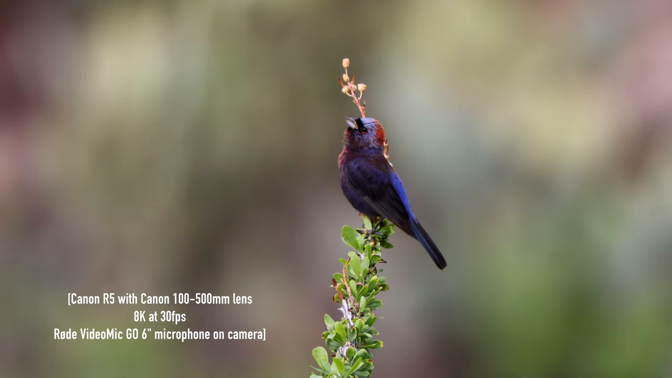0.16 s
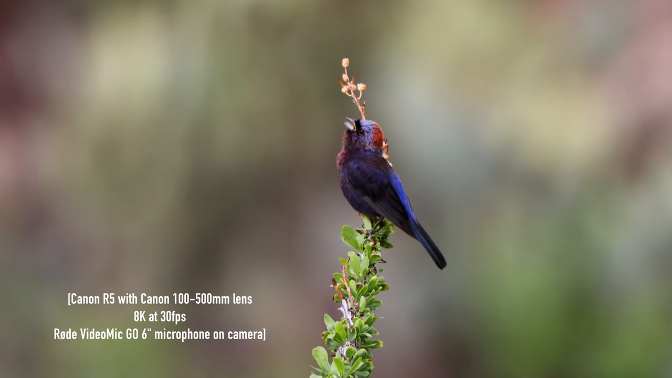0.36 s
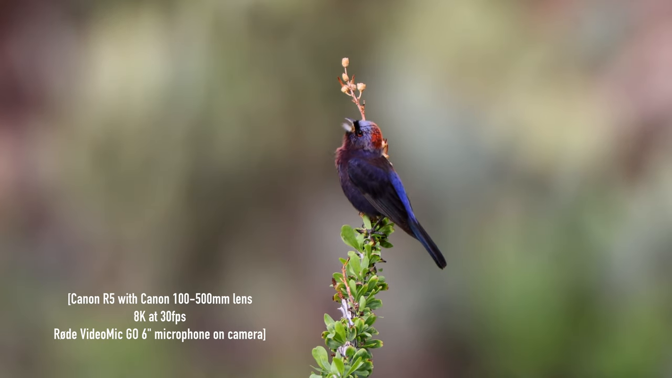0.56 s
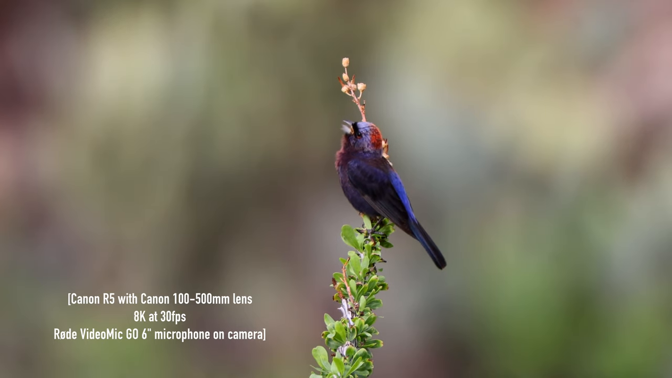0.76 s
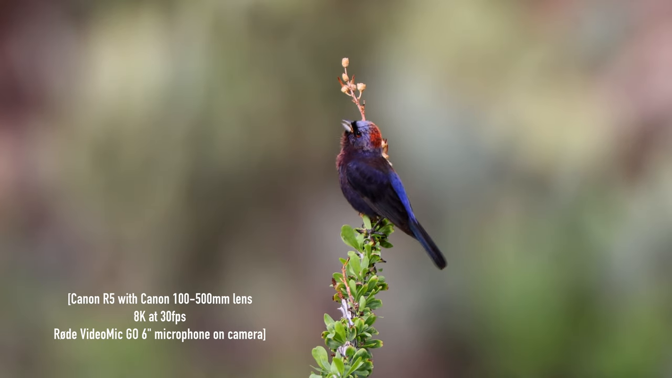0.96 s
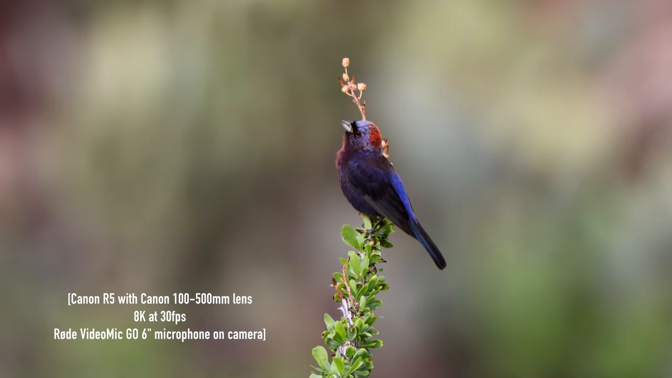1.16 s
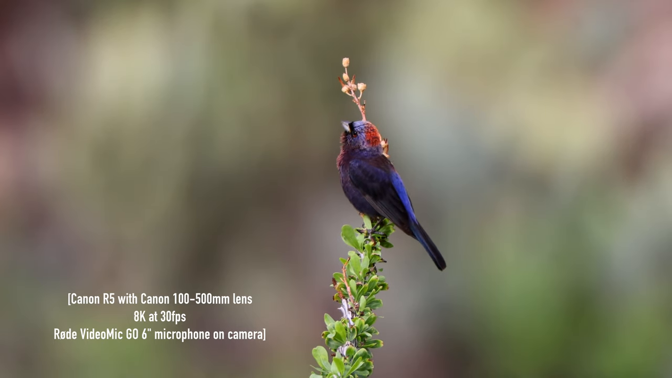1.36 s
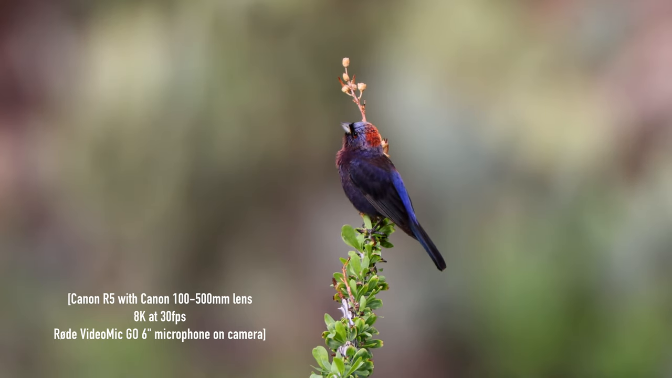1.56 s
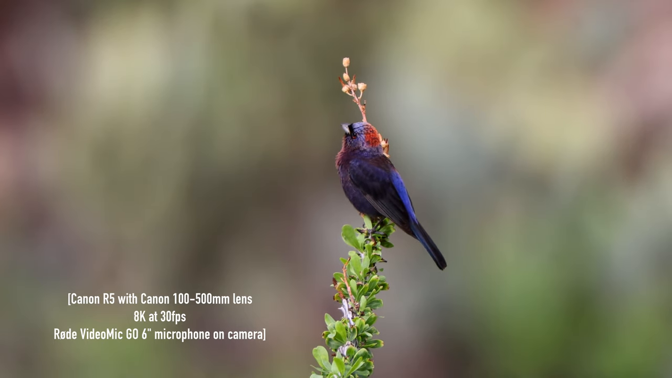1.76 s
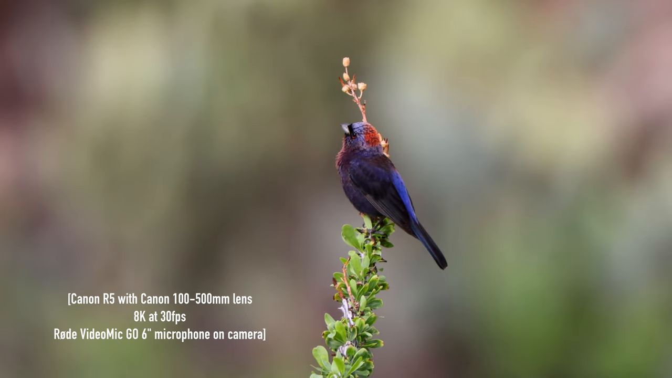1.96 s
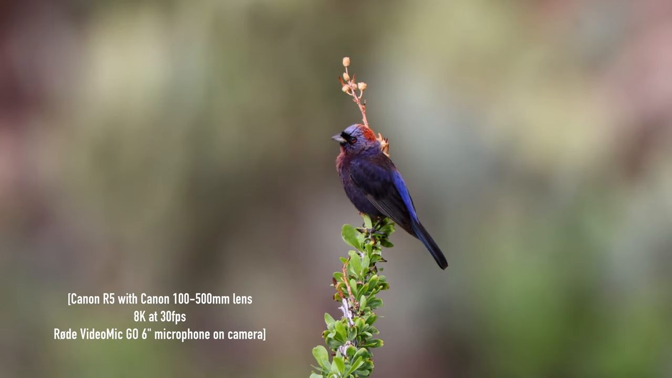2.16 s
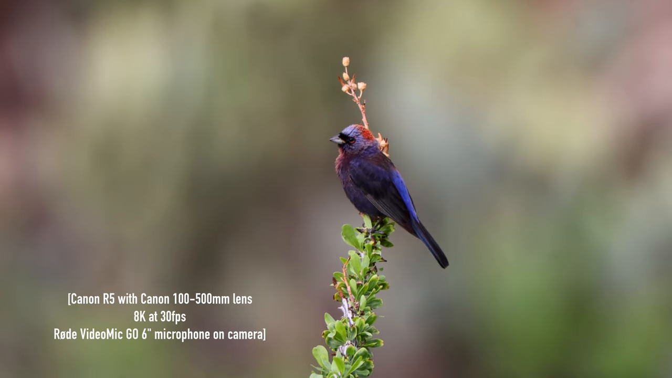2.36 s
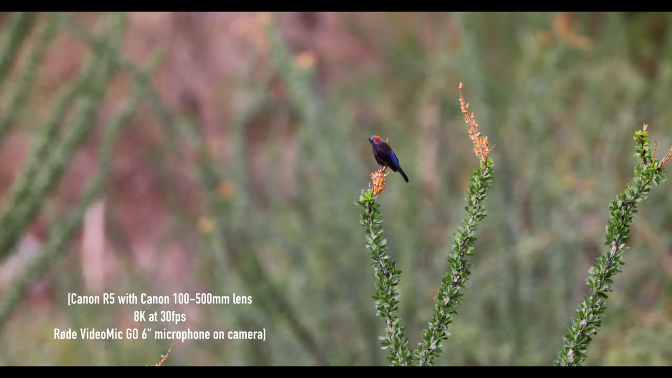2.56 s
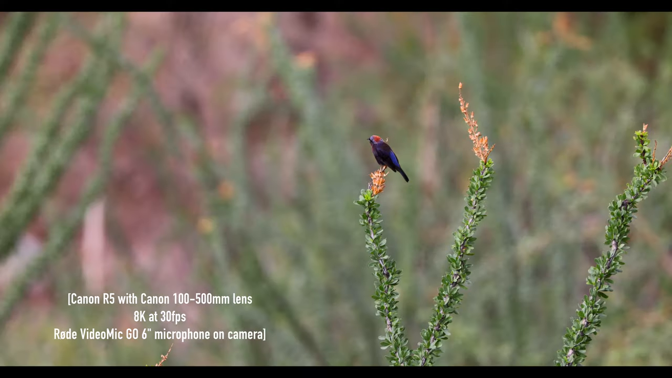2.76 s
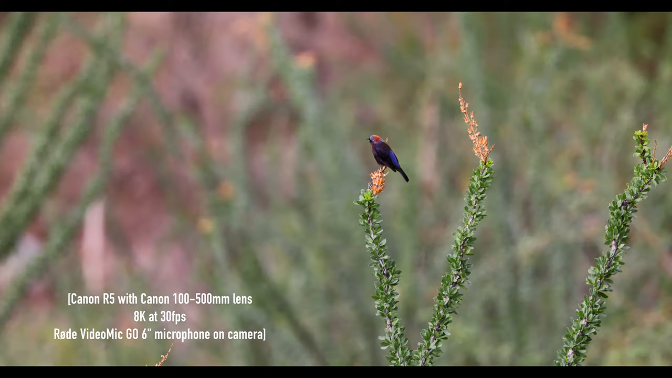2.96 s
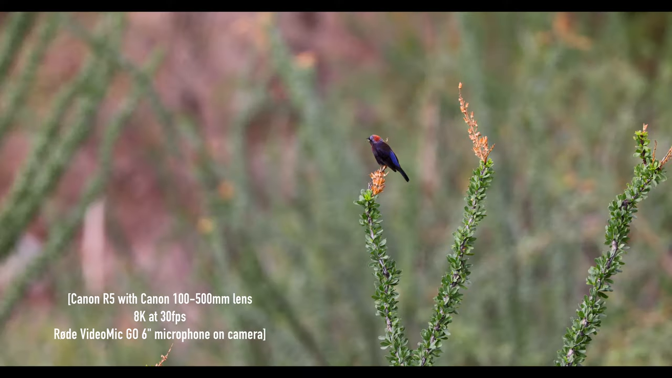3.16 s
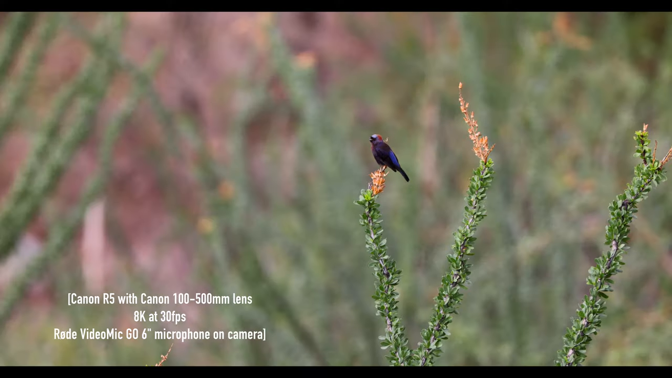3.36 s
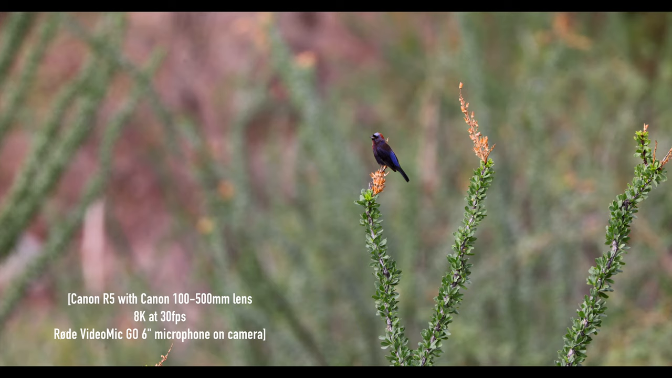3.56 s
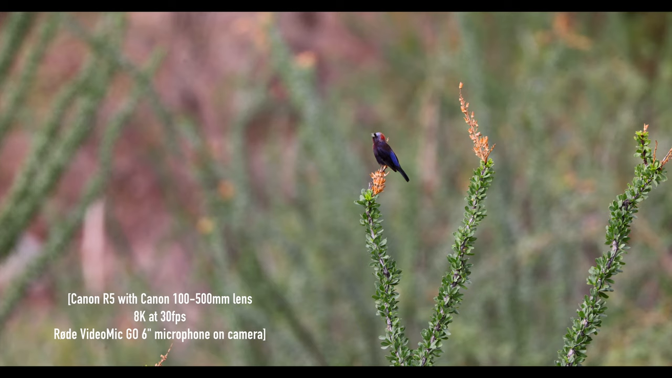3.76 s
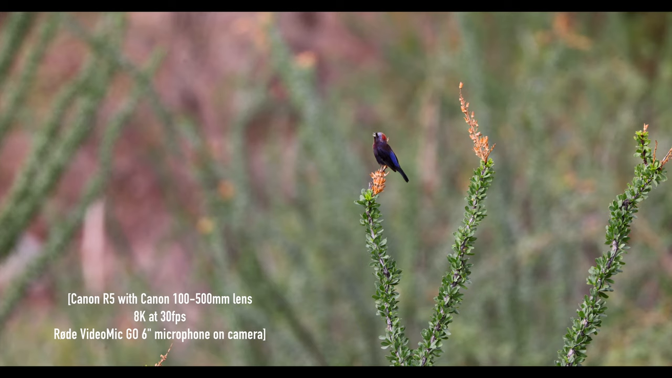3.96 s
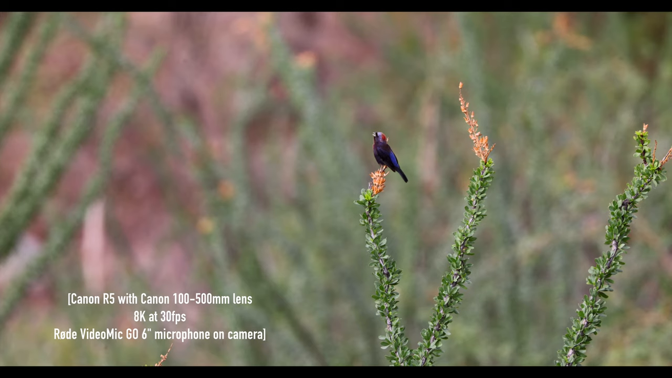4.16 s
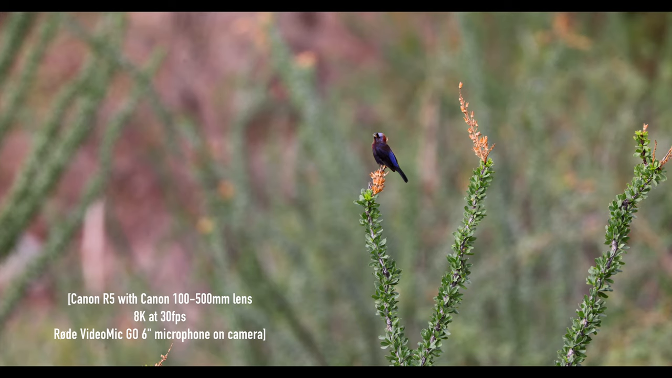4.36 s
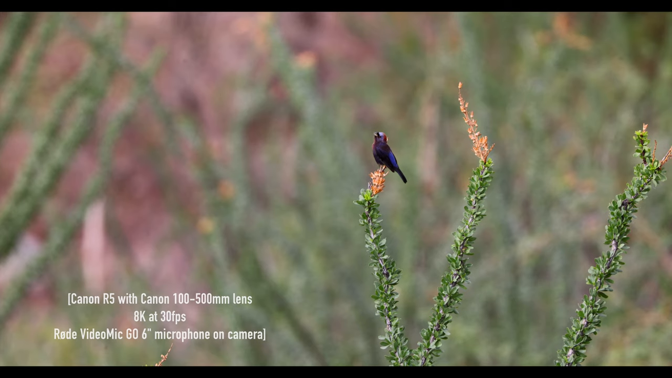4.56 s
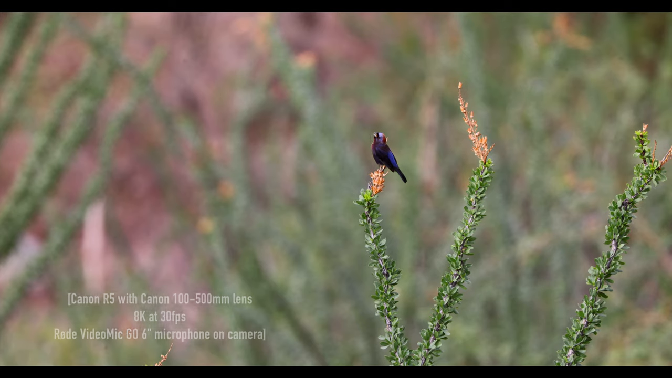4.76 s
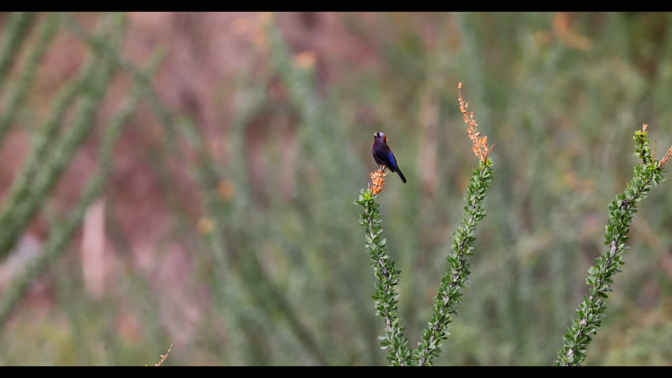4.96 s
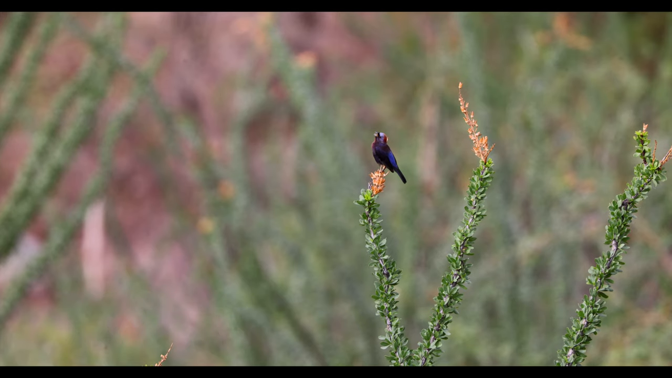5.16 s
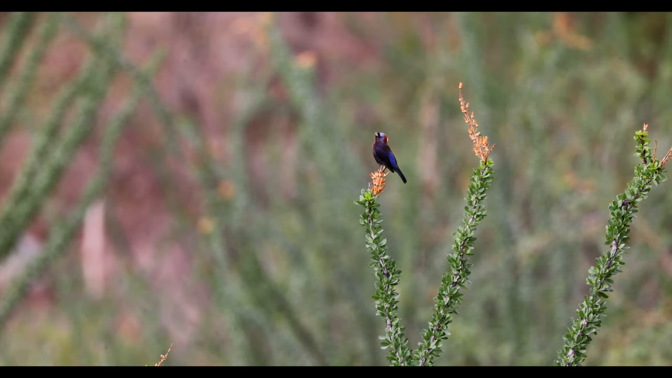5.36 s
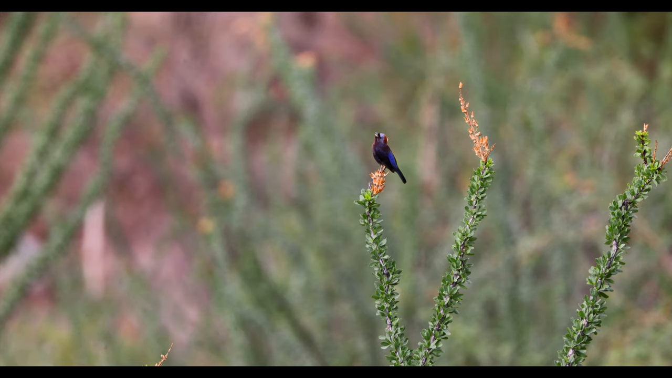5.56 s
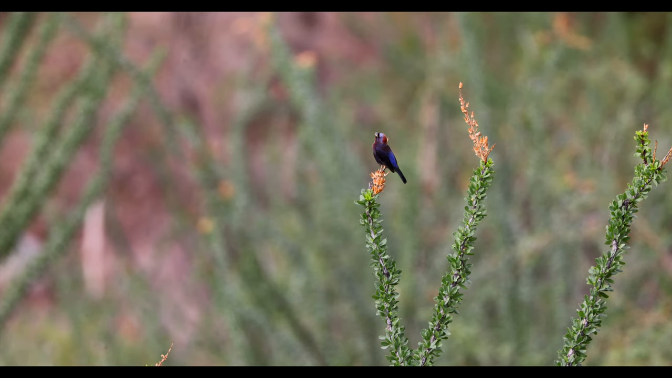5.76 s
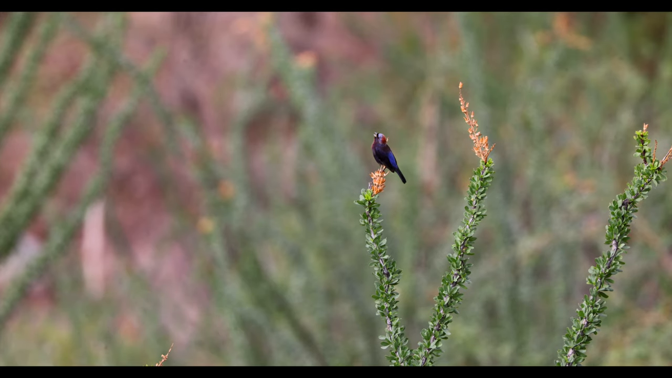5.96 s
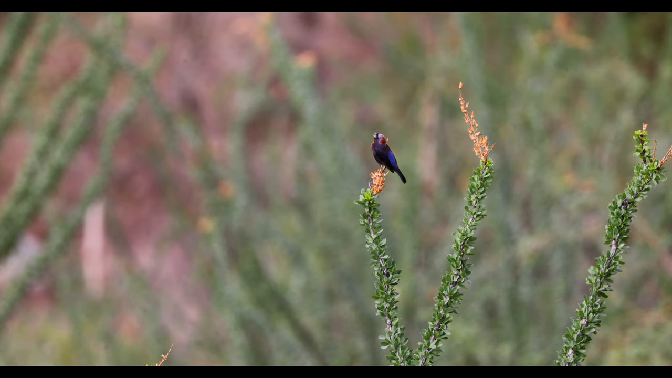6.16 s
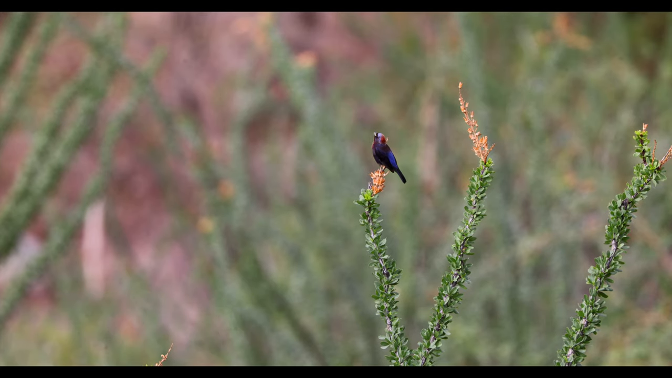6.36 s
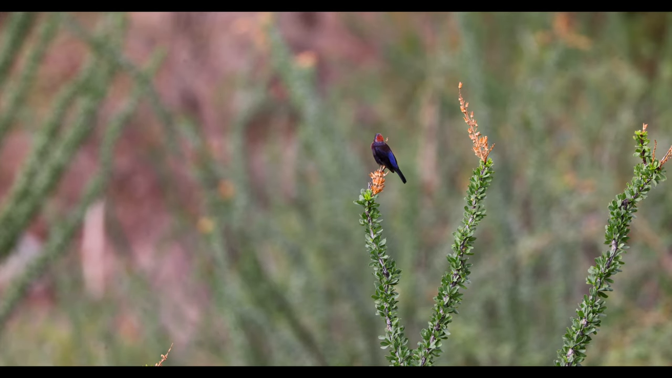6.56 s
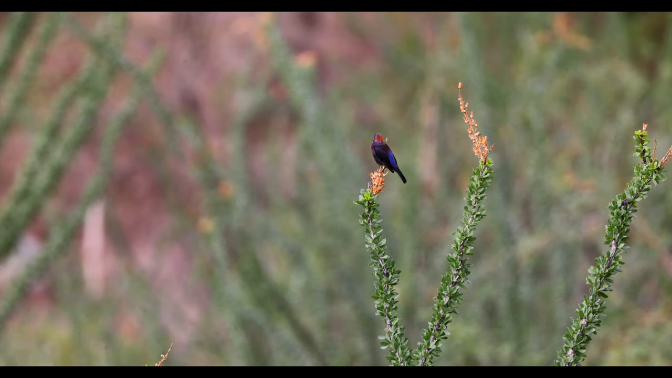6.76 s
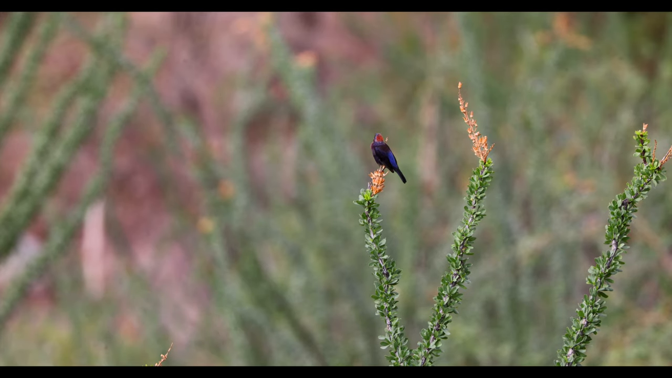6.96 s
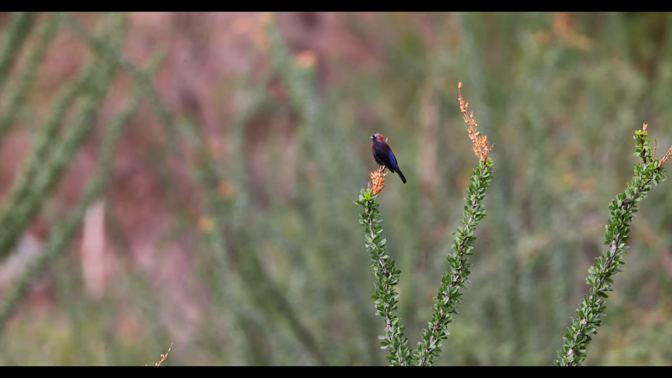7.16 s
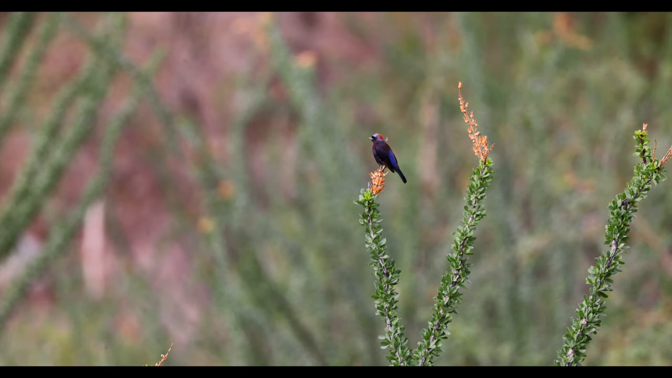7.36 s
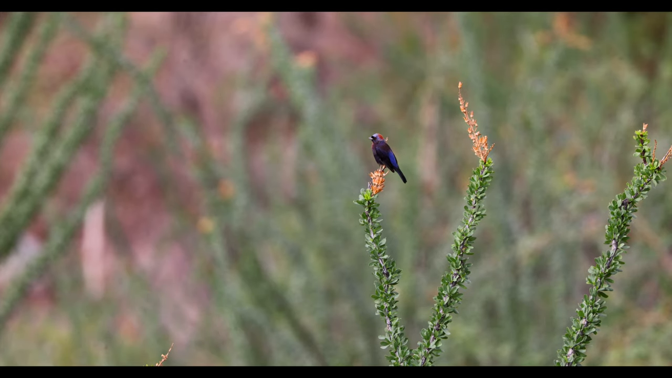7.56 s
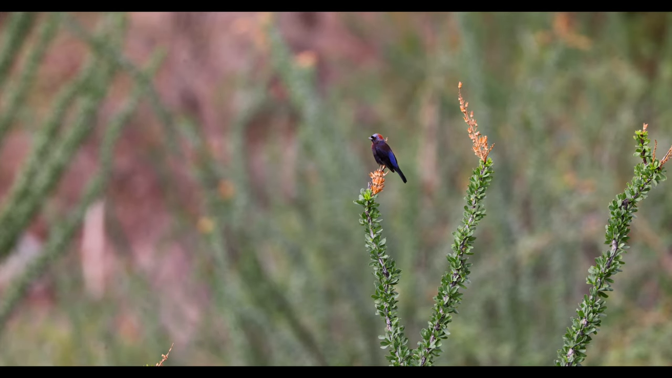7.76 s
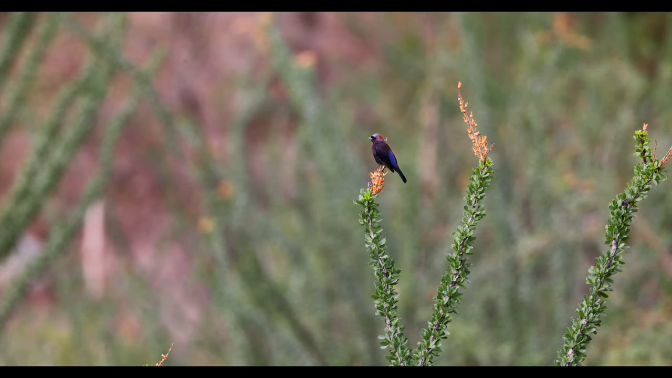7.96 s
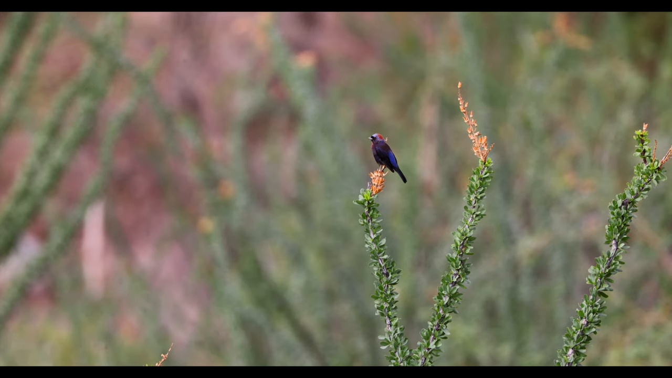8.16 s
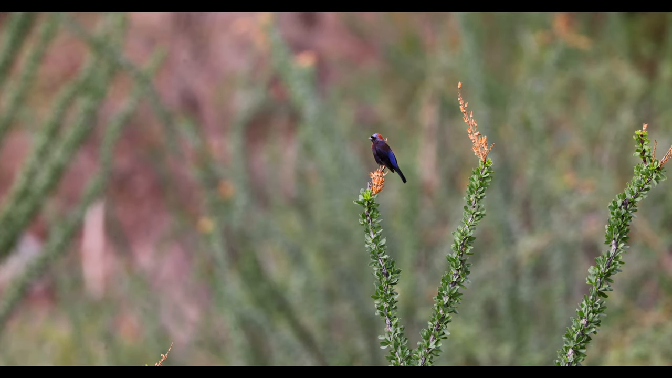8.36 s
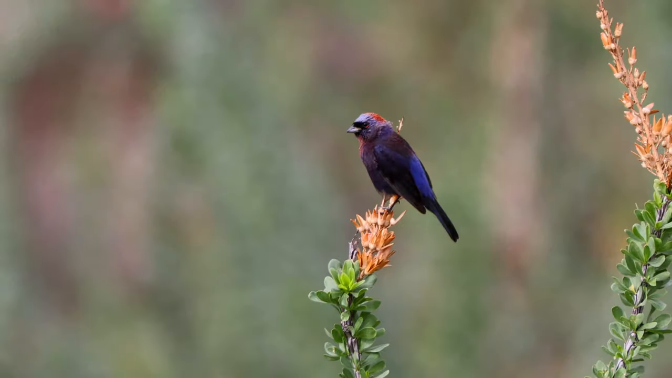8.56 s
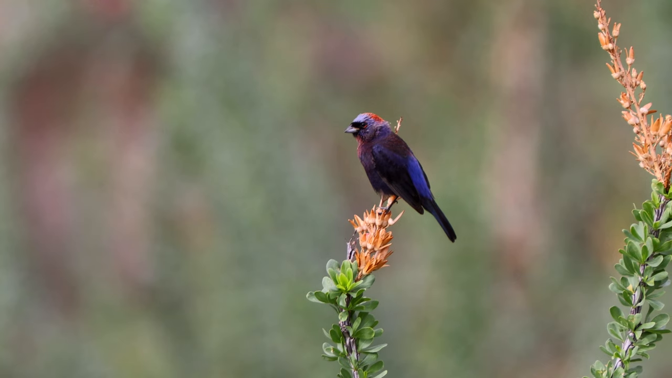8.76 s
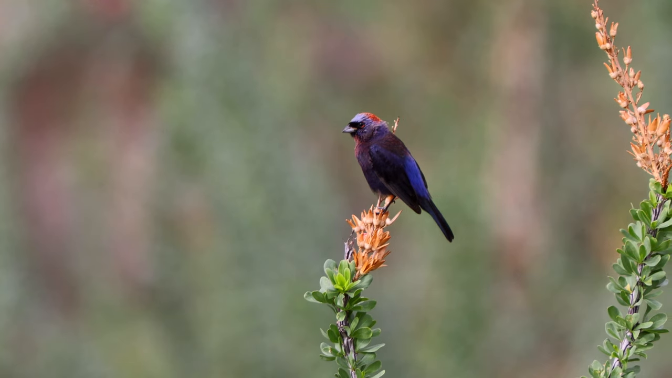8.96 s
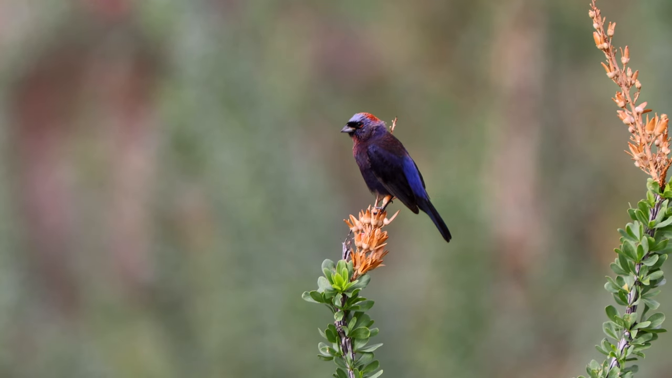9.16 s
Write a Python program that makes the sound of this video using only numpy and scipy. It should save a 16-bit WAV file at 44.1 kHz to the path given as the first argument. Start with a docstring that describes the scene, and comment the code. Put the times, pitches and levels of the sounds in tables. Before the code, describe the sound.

A finch-like bird sings two bright, tumbling phrases of sliding high notes, separated by lighter chirps and a growing jumble of answers. Distant birds ring off canyon walls early on. Midway, low soft wind bumps the on-camera microphone; afterwards five drawn-out descending whistles sound from further off, then muffled warbling over blurred twitter. Steady cricket trill, faint drones and valley air lie underneath.

```python
"""A finch-like bird in a rocky canyon opens with fast warbles: sines on rounded, gliding pitch paths.
Far birds ring in decaying-noise echoes, which break off at 2.57 s; a neighbour answers in single bent strokes.
From about 4 s gusts of low noise thump the microphone; the song returns at 4.9 s, long falling whistles
follow from 6.2 s, and from 8.6 s the song is duller and further away over a band-noise twitter.
Throughout: a pulsed-sine cricket over band noise, two narrow-noise drones, spectrally shaped air."""
import sys
import numpy as np
from scipy import signal
from scipy.fft import rfft, irfft
from scipy.io import wavfile
from scipy.ndimage import uniform_filter1d

SR = 44100
rng = np.random.default_rng(int(sys.argv[2]) if len(sys.argv) > 2 else 0)


def to_wav(s):
    """Save 16-bit WAV."""
    ch = np.atleast_2d(s).T  # columns
    pcm = np.round(np.clip(ch, -1, 1) * 32767)  # PCM
    wavfile.write(sys.argv[1], SR, pcm.astype(np.int16))


N = 409688


def amp(db):
    """Amplitude factor of a level in dB."""
    return 10 ** (np.asarray(db, float) / 20)


def evened(x):
    """Scale to unit RMS."""
    return x / np.sqrt(np.mean(x ** 2) + 1e-20)


def read(points, hz):
    """Curve over log frequency."""
    f_hz, value = np.transpose(points)
    return np.interp(np.log(hz + 1), np.log(f_hz + 1), value)


def along(curve):
    """Curve over time, one value a sample."""
    t_s, value = np.transpose(curve)
    return np.interp(np.arange(N) / SR, t_s, value)


def wander(count, hz):
    """Smooth chance of about unit RMS, changing about hz times a second."""
    width = max(int(SR / hz), 1)
    noise = rng.standard_normal(count + 2 * width)
    smooth = uniform_filter1d(uniform_filter1d(noise, width), width)
    return evened(smooth)[:count]


def narrow(hz, width_hz):
    """Noise in a Gaussian band round hz, unit RMS."""
    f_hz = np.fft.rfftfreq(N, 1 / SR)
    band = np.exp(-((f_hz - hz) / width_hz) ** 2)
    return evened(irfft(rfft(rng.standard_normal(N)) * band, N))


def add(mix, start_s, sound):
    """Mix a sound in at its start time, cut at the end."""
    part = mix[round(start_s * SR):][:len(sound)]
    part += sound[:len(part)]


BEND = 1.18  # glides hurry at high pitch and linger at low
SWELL = 0.6  # exponent of the curve along which strength swells


def whistle(rows, waver_db, round_s=0.0017):
    """One side of the syrinx: a sine on a rounded pitch path, its strength wavering."""
    t_s, hz, db = np.transpose(sorted(rows))
    t = np.arange(t_s[0], t_s[-1], 1 / SR)
    width = max(int(round_s * SR), 1)
    pitch = np.interp(t, t_s, hz ** -BEND) ** (-1 / BEND)
    pitch = uniform_filter1d(pitch, width, mode="nearest")
    level = np.interp(t, t_s, amp(SWELL * db)) ** (1 / SWELL)
    level = uniform_filter1d(level, width, mode="nearest")
    level *= amp(waver_db * wander(len(t), 160))
    level *= signal.windows.tukey(len(t), min(0.006 * SR / len(t), 1))  # 3 ms fades
    cycles = np.cumsum(pitch) / SR + rng.random()
    return np.sqrt(2) * level * np.sin(2 * np.pi * cycles)


CUT_S = 2.572  # all ringing breaks off here


def canyon(x, t60, start_s, wall_s=0, wall_db=-np.inf):
    """Scattered echoes dying away, with a denser return from a facing rock wall; they break off once."""
    t = np.arange(int(1.2 * t60 * SR)) / SR
    wall = amp(wall_db) * np.exp(-((t - wall_s) / 0.0038) ** 2)
    low, high = rng.standard_normal((2, len(t)))
    low = signal.sosfilt(signal.butter(2, 5000, fs=SR, output="sos"), low)
    high = signal.sosfilt(signal.butter(2, 5000, "highpass", fs=SR, output="sos"), high)
    # air swallows the treble faster
    decay = low * amp(-60 * t / t60) + high * amp(-60 * t / (0.71 * t60))
    tail = decay * (t > start_s) + wall * low
    tail = tail / np.linalg.norm(tail)
    before = np.arange(N) < CUT_S * SR
    wet_before, wet_after = [signal.oaconvolve(x * part, tail)[:N] for part in (before, ~before)]
    return wet_before * before + wet_after


# spectrum of the air: f/Hz, relative density/dB per Hz
AIR_SPECTRUM = [(12, -30), (20, -6.5), (104, -10.5), (234, -12.5), (376, -14.5), (756, -17), (1180, -20.5),
                (2970, -26.5), (4400, -38), (5500, -28), (15900, -29)]
# left-right likeness of the air: f/Hz, correlation/1
AIR_LIKENESS = [(30, 0.25), (125, 0.63), (500, 0.92), (1500, 0.97), (3500, 1), (6000, 0.97), (9000, 0.43),
                (15000, 0.41)]
AIR_DB = -33  # overall RMS


def air():
    """Distant rush of the valley and hiss of the microphone: random short-time spectra."""
    frames, hz = N // 256 + 5, np.fft.rfftfreq(1024, 1 / SR)
    a, b, c, d, patches = rng.standard_normal((frames, 513, 5)).T
    patches = uniform_filter1d(patches, 12, 0)  # over frequency
    patches = evened(uniform_filter1d(patches, 14, 1))  # over time
    same = np.clip(read(AIR_LIKENESS, hz), -1, 1)[:, None]
    left = a + 1j * b
    right = same * left + np.sqrt(1 - same ** 2) * (c + 1j * d)
    spectra = np.array([left, right])
    spectra *= amp(read(AIR_SPECTRUM, hz))[:, None] * amp(0.63 * patches)
    noise = signal.istft(spectra, nperseg=1024, noverlap=768)[1][:, :N]
    return amp(AIR_DB) * evened(noise)


# gusts that thump the microphone: t/s, level/dB before lumpiness
GUST_PEAKS = [(4.18, -26), (4.31, -33.5), (4.58, -35), (4.72, -30), (4.87, -23), (5.33, -34), (5.9, -21.5),
              (6.48, -29), (6.631, -29.5), (7.12, -29), (7.2, -31.5), (7.7, -27.5), (8.2, -37), (8.63, -30)]
# breeze: t/s, level/dB before lumpiness
BREEZE_LEVEL = [(0, -52), (3.7, -44), (4.0, -32), (6.0, -32.5), (6.2, -39), (7.7, -33), (8.2, -38),
                (9.29, -34.5)]


def wind():
    """Lumpy low buffeting, mostly alike on both sides; its flurries and gusts reach higher in pitch."""
    t = np.arange(N) / SR
    gusts = sum(amp(db) * np.exp(-((t - t_s) / 0.037) ** 2) for t_s, db in GUST_PEAKS)
    breeze = amp(along(BREEZE_LEVEL))
    flurries = breeze * amp(-8 + 3.9 * wander(N, 17))
    out = 0
    for top_hz, level in ((40, breeze), (90, gusts + flurries)):
        low = signal.butter(3, [14, top_hz], "bandpass", fs=SR, output="sos")
        both, apart = (evened(signal.sosfilt(low, v)) for v in rng.standard_normal((2, N)))
        sides = np.array([both + 0.064 * apart, both - 0.19 * apart])
        out = out + level * amp(1.76 * wander(N, 10.5)) * sides
    return out


def drones():
    """Narrow noise bands: a thin steady tone and a soft low hoot of wavering level."""
    tone = amp(-58.0) * narrow(1222, 6.5)
    hoot = amp(-49.5 + 2.3 * wander(N, 15)) * narrow(633, 45)
    return tone + hoot


def cricket():
    """Three falling pulses 45 ms apart, about seven times a second, over the blur of farther crickets."""
    since_s = (np.arange(N) / SR - 0.038 + 0.01 * wander(N, 3)) % 0.137
    pulses = sum(np.exp(-((since_s - 0.01 - 0.0447 * k) / 0.0058) ** 2) for k in range(3))
    pitch = 5250 - 14000 * (since_s % 0.042) + 60 * wander(N, 32.65)  # Hz
    uneven = amp(2.5 * wander(N, 14))
    chirps = pulses * uneven * amp(-41.0) * np.sin(2 * np.pi * np.cumsum(pitch) / SR)
    blur = amp(-53 + 3 * wander(N, 40)) * narrow(5100, 170)
    return chirps + blur


# distant twitter of many birds: t/s, level/dB before flicker
TWITTER_LEVEL = [(0, -44), (8.0, -40.5), (8.3, -45.5), (8.59, -46), (8.61, -41.5), (9.29, -38.5)]


def twitter():
    """A blurred band of distant song: band noise of flickering level."""
    return narrow(3980, 980) * amp(along(TWITTER_LEVEL) + 2.2 * wander(N, 3.4))


# far birds, a short note a row: t/s, length/s, first f/Hz, last f/Hz, peak level/dB before waver
FAR_NOTES = [(0.037, 0.062, 1774, 1760, -39), (0.273, 0.13, 2783, 2698, -28),
             (0.484, 0.098, 2030, 2007, -36.5), (0.777, 0.05, 1804, 2020, -33.5),
             (0.824, 0.062, 2146, 2245, -33), (1.018, 0.1, 2786, 2675, -25.5),
             (1.22, 0.043, 1710, 1714, -39), (1.385, 0.062, 2040, 2000, -34),
             (1.721, 0.077, 1810, 1850, -36.5), (1.97, 0.13, 2830, 2650, -26),
             (2.165, 0.06, 3310, 3320, -42), (2.611, 0.038, 2370, 2380, -38),
             (3.065, 0.072, 2240, 2224, -42), (3.298, 0.06, 2510, 2560, -40.5),
             (4.078, 0.089, 2400, 2360, -37), (2.313, 0.089, 3120, 3080, -43), (.93, 0.12, 640, 632, -41),
             (6.975, 0.028, 3340, 3080, -33)]


def far_birds():
    """Short notes from far away, carried on by a long echo that is fainter after the break."""
    mix = np.zeros(N)
    for start_s, length, first_hz, last_hz, db in FAR_NOTES:
        middle_hz = 0.3 * first_hz + 0.7 * last_hz
        note = [(0, first_hz, db - 5), (0.5 * length, middle_hz, db), (length, last_hz, db - 6)]
        add(mix, start_s, whistle(note, waver_db=3.0))
    echo_db = np.where(np.arange(N) < CUT_S * SR, -1.5, -9)
    return mix + amp(echo_db) * canyon(mix, t60=6.8, start_s=0.011, wall_s=0.5, wall_db=-11)


HOOK_S, SETTLE_S, DROOP_S = 0.014, 0.016, 0.0163  # rise time; time constants of settling and droop
HOOK_DB, SWELL_DB = 4.5, -13  # boost on the hook; level offset at the start of its rise
# long falling whistles: t/s, length/s, f/Hz, hook at both ends/Hz, sag/(Hz/s), level/dB once settled
FALLING_WHISTLES = [(0.453, 0.219, 8140, 294, 3200, -30), (6.212, 0.305, 4410, 10, 1222, -21.5),
                    (6.62, 0.26, 4303, 257, 1145, -21.5), (6.97, 0.25, 4280, 281, 1258, -22.5),
                    (7.308, .214, 4115, 292, 1020, -23.5), (7.626, 0.21, 4128, 255, 1427, -24.5)]


def whistler():
    """Long whistles from further off: a hook upward, a slow sag, a droop at the end, blurred by their echo."""
    mix = np.zeros(N)
    for start_s, length, hz, hook_hz, sag, db in FALLING_WHISTLES:
        t = np.arange(0, length, 0.002)
        rise = np.maximum(1 - t / HOOK_S, 0)
        settle = np.exp(-np.maximum(t - HOOK_S, 0) / SETTLE_S)
        droop = np.exp((t - length) / DROOP_S)
        pitch = hz - sag * t + hook_hz * (settle - 2 * rise - droop)
        level_db = db + HOOK_DB * settle + SWELL_DB * rise
        add(mix, start_s, whistle(zip(t, pitch, level_db), waver_db=2.0))
    return mix + amp(-7) * canyon(mix, t60=1.1, start_s=0.00066, wall_s=0.4, wall_db=-9)


ONSET_DB, END_DB = -13, -12.5  # stroke ends, relative to its turn
ROUNDING = 0.2  # share of a stroke's length over which its bend is rounded
FAINT_DB = -32.7  # strokes below this come from a distant singer
CLOSE_S = 0.002  # first echoes from nearby rocks
LATE_S = 8.6  # from here the song comes from further away
# the song, a group a syllable, a list a note, a row a point: t/s, f/Hz, level/dB before waver
SONG_NOTES = [
    [ [(0.0, 3130, -18.5), (0.017, 4490, -13), (0.024, 4900, -30)], [(0.018, 3210, -29), (0.03, 3760, -8),
     (0.046, 4570, -38)], [(0.04, 2960, -25.5), (0.058, 3340, -17), (0.09, 2370, -40)], [(0.11, 2380, -32),
     (0.125, 2625, -23.5), (0.142, 2720, -29)], ],
    [ [(0.212, 5230, -28), (0.219, 3710, -13), (0.239, 3860, -7.5), (0.249, 3370, -16), (0.256, 2770, -50),
     (0.27, 5360, -11.5), (0.301, 4300, -10), (0.335, 3740, -7.5), (0.374, 2940, -34)], ],
    [ [(0.433, 5550, -38), (0.451, 5180, -16), (0.46, 5830, -17)], [(0.452, 4240, -21), (0.464, 5620, -8.5),
     (0.474, 6650, -18)], [(0.486, 6430, -25), (0.492, 4910, -12), (0.501, 4190, -13.5), (0.509, 4350, -18),
     (0.524, 2350, -39)], ],
    [ [(0.53, 2350, -54), (0.554, 3910, -7), (0.562, 5240, -18.5), (0.574, 3340, -15), (0.591, 2630, -24),
     (0.612, 2240, -32)], ],
    [ [(0.672, 7400, -33), (0.686, 6030, -11.5), (0.695, 6170, -15), (0.707, 7000, -27)], ],
    [ [(0.766, 5420, -41), (0.776, 5400, -12), (0.789, 4070, -19)], [(0.785, 5620, -17),
     (0.799, 4600, -11.5), (0.807, 4100, -20)], [(0.803, 6780, -25), (0.811, 4530, -10.5),
     (0.82, 3950, -10), (0.83, 3850, -24)], [(0.829, 2880, -66), (0.844, 3690, -7.5), (0.856, 4030, -15.5),
     (0.863, 4000, -65)], ],
    [ [(0.907, 5680, -32), (0.917, 5530, -10.5), (0.931, 4930, -21)], [(0.929, 6620, -19),
     (0.94, 4620, -13.5), (0.949, 3950, -22)], [(0.945, 6760, -19), (0.954, 4500, -12), (0.97, 3810, -12)],
     [(0.971, 2990, -45), (0.988, 3820, -7.5), (1.004, 4440, -24)], ],
    [ [(1.06, 6070, -30), (1.071, 6030, -16.5), (1.082, 7000, -39)], [(1.084, 6600, -36),
     (1.089, 5100, -20), (1.094, 4500, -34)], [(1.088, 5610, -15), (1.096, 5120, -15), (1.128, 3540, -9),
     (1.139, 2800, -82), (1.147, 4080, -11), (1.167, 3570, -14)], ],
    [ [(1.38, 5390, -33), (1.39, 5380, -13.5), (1.398, 6060, -27)], [(1.391, 4270, -19),
     (1.407, 6180, -15.5), (1.414, 6700, -19)], [(1.425, 6840, -25), (1.441, 5360, -12), (1.454, 5530, -25),
     (1.459, 5300, -23)], ],
    [ [(1.51, 2130, -46), (1.519, 2727, -31), (1.535, 2080, -35.5), (1.551, 2110, -47), (1.581, 3190, -21),
     (1.593, 5600, -33), (1.605, 3650, -16.5), (1.625, 2840, -35)], ],
    [ [(1.683, 2600, -21), (1.688, 4520, -25.5), (1.693, 6510, -27), (1.701, 5540, -26),
     (1.707, 6500, -29)], ],
    [ [(1.785, 4420, -34), (1.797, 4830, -26), (1.802, 6270, -67), (1.814, 3900, -18.5), (1.834, 2820, -40),
     (1.847, 2460, -32), (1.878, 3580, -33)], [(1.89, 3140, -40), (1.906, 3760, -37), (1.921, 3870, -46)], ],
    [ [(3.275, 5680, -26), (3.289, 6650, -39), (3.333, 4630, -20), (3.346, 3460, -26), (3.358, 4900, -26),
     (3.367, 5180, -17.5), (3.405, 5110, -48)], ],
    [ [(3.601, 3710, -33), (3.617, 4090, -24.5), (3.632, 3490, -20), (3.656, 3440, -21), (3.67, 2990, -31),
     (3.689, 3300, -27.5), (3.708, 2520, -44)], ],
    [ [(4.1, 4160, -17), (4.111, 6320, -23), (4.127, 4130, -15.5), (4.143, 3700, -14), (4.155, 3160, -33),
     (4.172, 4310, -12), (4.189, 4580, -17), (4.225, 4330, -45)], ],
    [ [(4.286, 4800, -30), (4.296, 5200, -17), (4.31, 5400, -25), (4.325, 3730, -13), (4.355, 3450, -16),
     (4.376, 4230, -10.5), (4.389, 4440, -12.5), (4.406, 3690, -10), (4.417, 2840, -50)], ],
]
# repeats, a list a syllable: delay/s, level change/dB
SONG_REPEATS = [
    [(4.935, -0.5)],
    [(4.933, 0)],
    [(4.928, 0.5), (8.222, -11.5)],
    [(4.928, 0), (8.213, -9)],
    [(4.931, 2.5), (8.221, -7.5)],
    [(4.926, 0.5), (8.225, -8.5), (8.378, -9.5)],
    [(4.924, 1)],
    [(.153, -1.5), (4.92, 1), (5.075, 0.5)],
    [(4.924, 1)],
    [(4.923, 1.5)],
    [(4.925, 3)],
    [(4.943, -3)],
    [],
    [],
    [],
    [],
]
# single bent strokes of both singers:
# t/s, length/s, first f/Hz, turn f/Hz, last f/Hz, place of turn/(0-1), level at turn/dB before waver
BENT_STROKES = [ (2.412, 0.095, 5080, 3410, 3280, .45, -37), (2.617, 0.064, 3920, 3350, 3430, 0.47, -36),
                (2.662, 0.1, 4200, 3970, 3640, 0.5, -33.5), (2.757, 0.026, 3500, 2950, 2850, 0.65, -34),
                (2.777, .028, 3570, 3300, 3150, .5, -36), (8.152, .03, 3050, 2660, 3000, .5, -39.5),
                (2.891, 0.057, 4900, 3700, 3550, 0.62, -30), (2.935, 0.014, 3750, 5000, 5400, 0.54, -27),
                (2.942, .07, 5400, 3800, 2890, 0.43, -25.5), (3.018, 0.038, 2950, 3650, 3430, .45, -29.5),
                (3.116, 0.059, 4900, 3540, 4040, 0.5, -30), (3.166, 0.14, 3900, 4530, 3520, 0.18, -31),
                (3.385, .016, 3300, 4300, 4750, .7, -28), (3.405, 0.019, 3730, 4170, 4450, 0.8, -29),
                (3.422, 0.05, 3760, 4130, 2960, 0.4, -28.5), (3.488, 0.04, 2750, 3520, 3370, 0.76, -29.5),
                (3.737, 0.048, 3470, 3870, 2980, 0.57, -25.5), (3.54, 0.044, 3300, 3200, 3100, .4, -42),
                (3.784, 0.012, 3930, 5000, 5300, 0.8, -28), (3.801, 0.1, 5260, 4070, 3230, 0.34, -27),
                (3.829, 0.02, 4980, 6100, 6070, 0.3, -24), (3.837, 0.052, 5180, 5280, 6830, 0.47, -16),
                (3.892, 0.014, 5900, 4800, 3600, 0.6, -17.5), (3.901, 0.035, 5900, 4460, 3900, 0.48, -14.5),
                (3.926, 0.053, 2760, 3710, 2920, 0.57, -21.5), (3.992, .017, 4350, 5000, 5950, .4, -29),
                (4.02, .02, 5260, 4500, 4200, 0.33, -32.5), (4.053, 0.056, 2550, 3700, 4200, 0.58, -28.5),
                (4.094, 0.039, 3470, 2920, 2500, 0.4, -30.5), (4.218, .03, 6200, 6250, 6900, 0.5, -38),
                (4.275, 0.027, 4800, 5930, 5610, 0.5, -19), (4.478, 0.013, 5600, 5200, 4400, 0.5, -25),
                (4.493, 0.011, 5340, 4930, 4300, 0.35, -25), (4.498, 0.025, 5770, 6240, 6640, 0.28, -17.5),
                (4.508, 0.029, 4970, 4250, 3620, 0.3, -25), (4.536, 0.039, 3100, 4110, 3470, 0.74, -23.5),
                (4.578, 0.021, 3380, 5350, 5340, 0.68, -18), (4.592, 0.027, 3340, 4430, 5500, 0.47, -13),
                (4.61, 0.031, 3580, 4360, 5580, .45, -10), (4.632, 0.049, 3580, 4130, 2690, 0.55, -11.5),
                (4.693, 0.06, 2330, 3690, 3400, 0.8, -18), (4.696, 0.026, 5430, 5400, 3800, .4, -29),
                (4.713, 0.043, 3690, 4660, 3900, 0.3, -24), (4.802, 0.031, 2700, 3020, 3230, .5, -29),
                (4.823, 0.066, 2940, 3410, 2880, 0.38, -28.5), (4.812, .018, 5430, 5960, 7280, .5, -21.5),
                (4.828, .019, 5350, 6330, 7860, 0.6, -15), (4.845, 0.015, 5670, 5900, 6900, 0.61, -14.5),
                (4.924, 0.014, 2890, 4330, 4900, 0.6, -16.5), (5.005, 0.059, 5800, 3810, 3100, 0.56, -24),
                (5.336, 0.062, 5400, 3780, 2550, 0.37, -27.5), (5.393, 0.033, 2550, 3490, 3280, .7, -28.5),
                (5.596, 0.042, 3920, 4170, 3940, 0.42, -25.5), (5.637, .028, 4000, 5500, 5400, .5, -34),
                (5.663, 0.058, 5400, 3740, 2770, 0.44, -27.5), (5.726, 0.019, 2830, 3230, 3370, 0.6, -27),
                (5.96, 0.052, 3740, 3310, 2610, 0.36, -33.5), (0.115, 0.024, 8700, 7750, 8900, 0.4, -37),
                (8.823, 0.064, 6110, 4780, 3490, 0.7, -32), (8.933, 0.083, 7000, 4600, 3490, 0.5, -32)]


def near_birds():
    """Song, repeats and strokes; faint strokes smeared, late song dulled and doubled by the ground."""
    mix, faint = np.zeros((2, N))
    for notes, again in zip(SONG_NOTES, SONG_REPEATS):
        for delay, db in [(0, 0)] + again:
            for note in notes:
                add(mix, min(note)[0] + delay, amp(db) * whistle(note, waver_db=0.8))
    for start_s, length, first_hz, turn_hz, last_hz, place, db in BENT_STROKES:
        note = [(0, first_hz, db + ONSET_DB), (place * length, turn_hz, db), (length, last_hz, db + END_DB)]
        stroke = whistle(note, waver_db=2.5, round_s=ROUNDING * length)
        add(faint if db < FAINT_DB else mix, start_s, stroke)
    mix = mix + faint + amp(-6) * canyon(faint, t60=0.26, start_s=CLOSE_S)
    late = np.arange(N) > LATE_S * SR
    dull = signal.sosfilt(signal.butter(2, 3700, fs=SR, output="sos"), mix * late)
    ground = amp(-12) * np.roll(dull, int(0.013 * SR)) * late
    mix = mix * ~late + dull + ground
    close = canyon(mix, t60=0.15, start_s=CLOSE_S)
    wide = canyon(mix, t60=1.1, start_s=0.0057, wall_s=0.22, wall_db=-24)
    return mix + amp(-10) * close + amp(-14.5) * wide


def scene():
    """Sum of all sources; air and wind are stereo, the rest alike on both sides."""
    background = air() + wind() + drones() + cricket() + twitter()
    return background + far_birds() + whistler() + near_birds()


EDGE_HZ = 15900


def record(dry):
    """The band limit of the recorder: a steep linear-phase low-pass."""
    lowpass = signal.firwin(1023, EDGE_HZ, window=("kaiser", 10), fs=SR)
    return signal.oaconvolve(dry, lowpass[None], "same")


dry = scene()
out = record(dry)
to_wav(out)
```